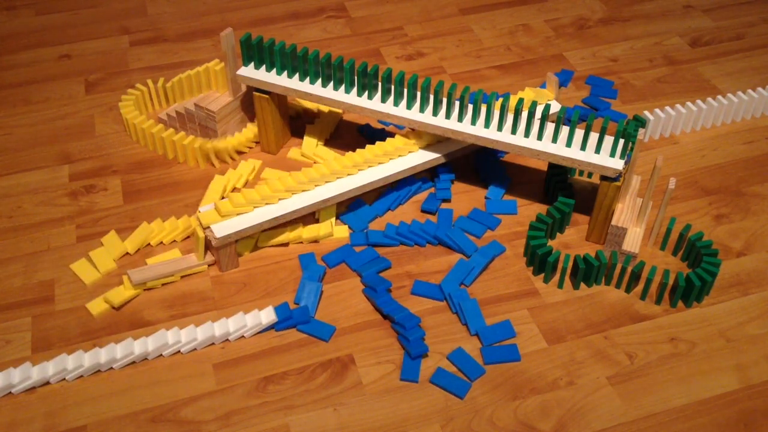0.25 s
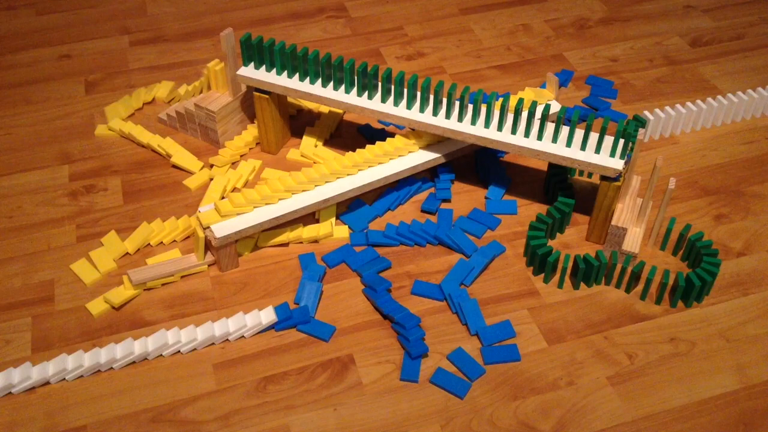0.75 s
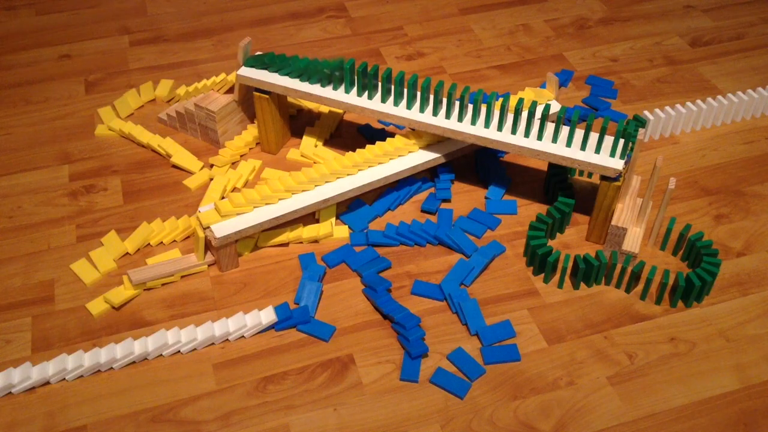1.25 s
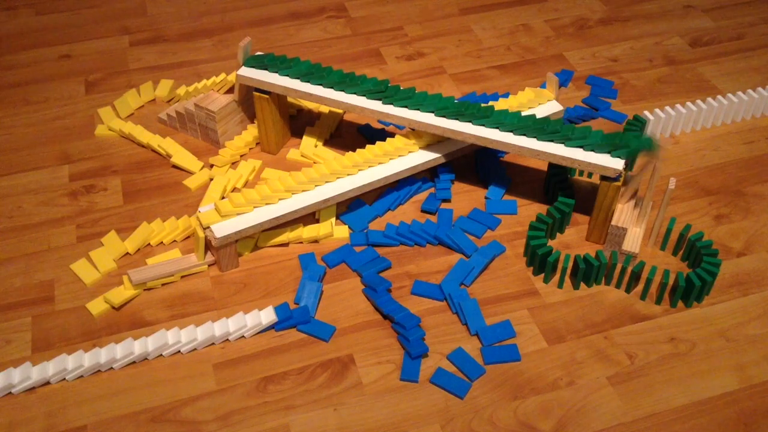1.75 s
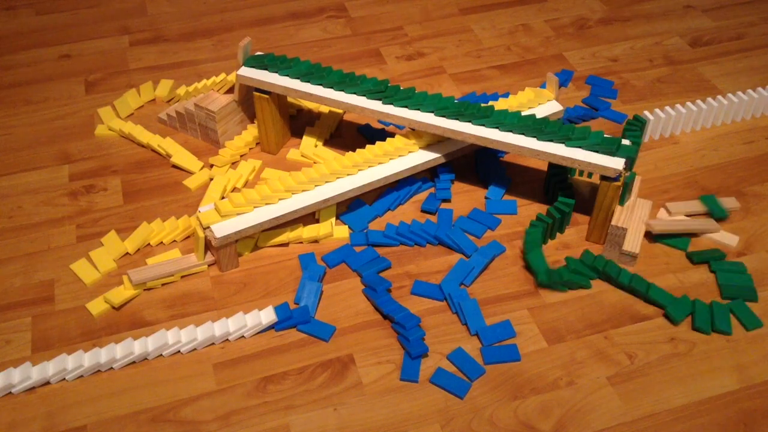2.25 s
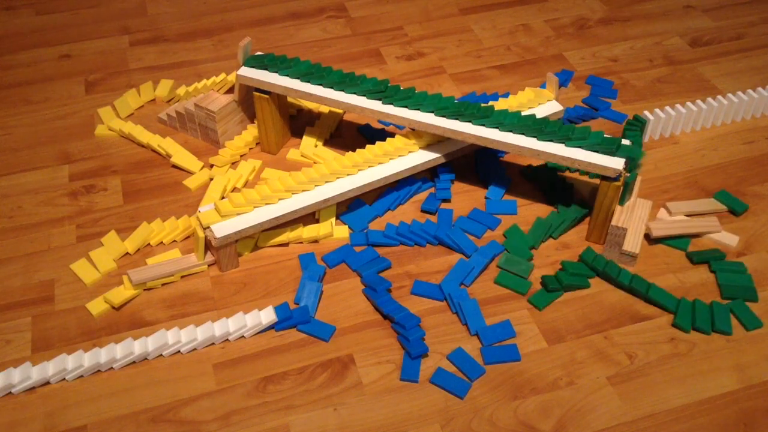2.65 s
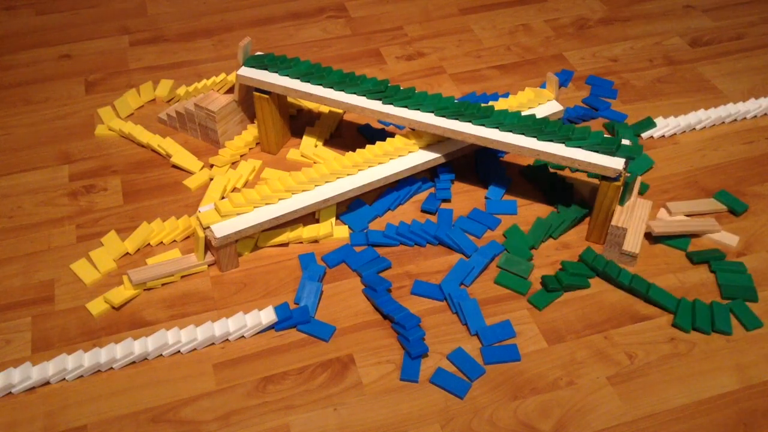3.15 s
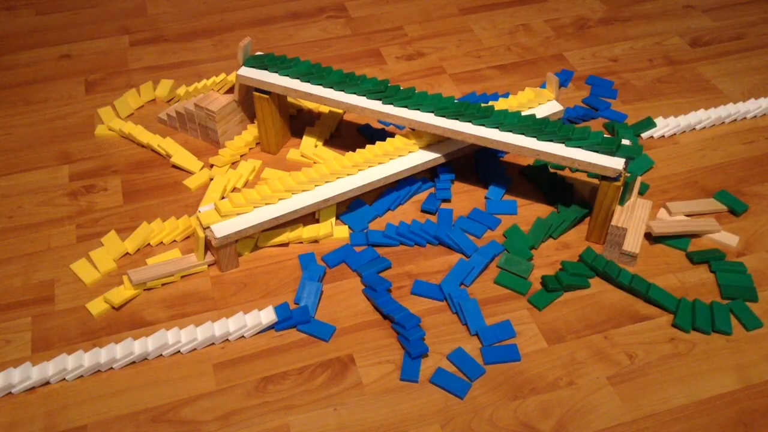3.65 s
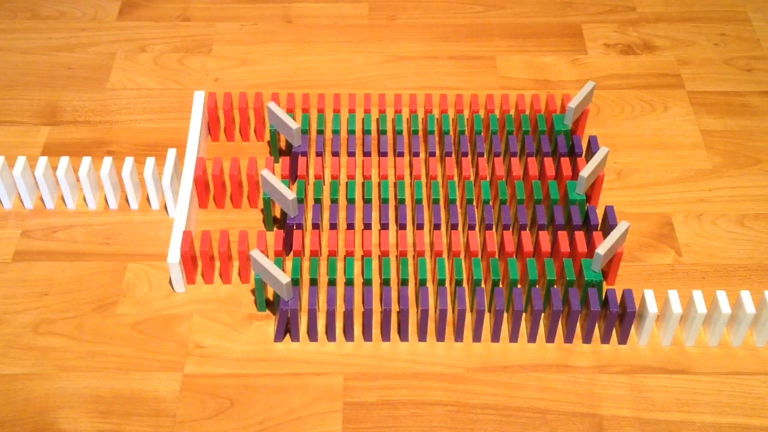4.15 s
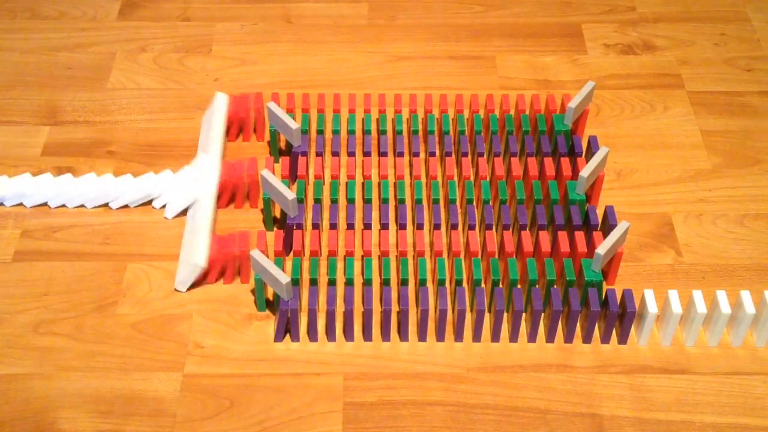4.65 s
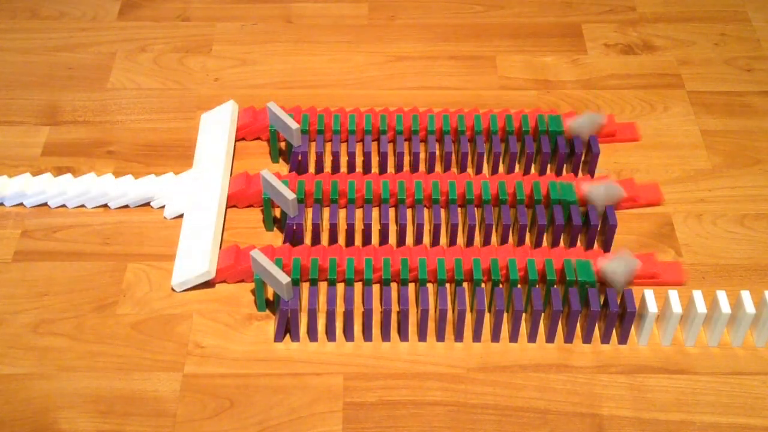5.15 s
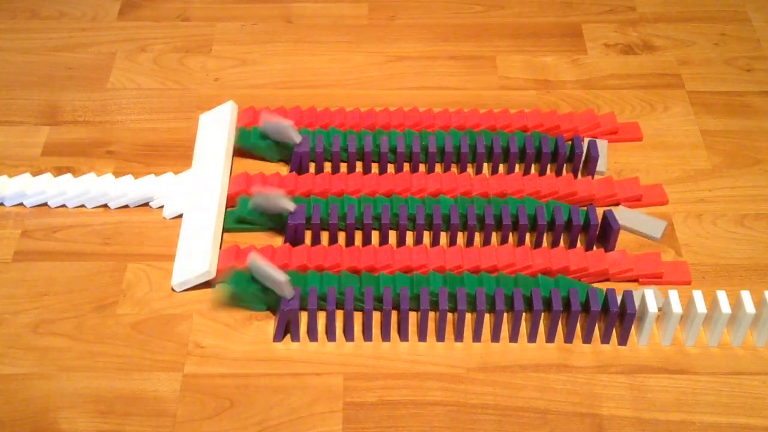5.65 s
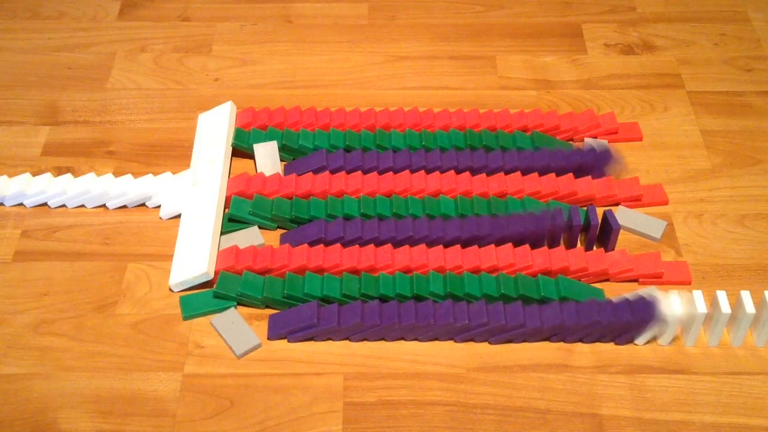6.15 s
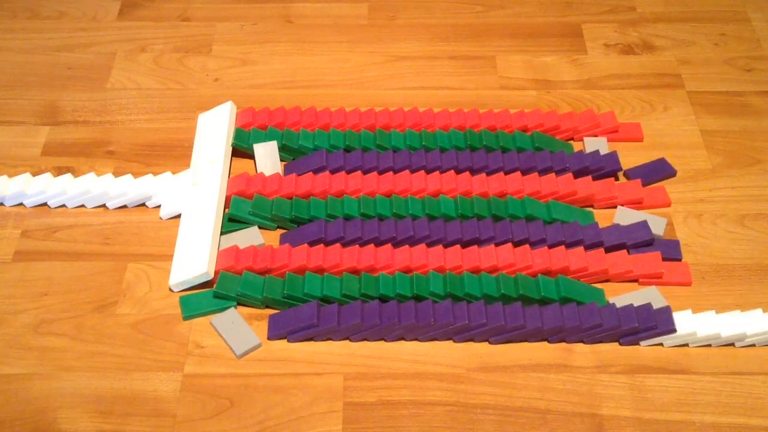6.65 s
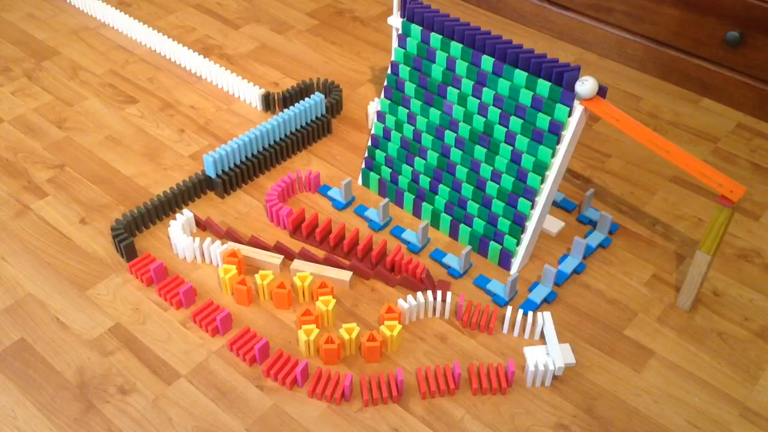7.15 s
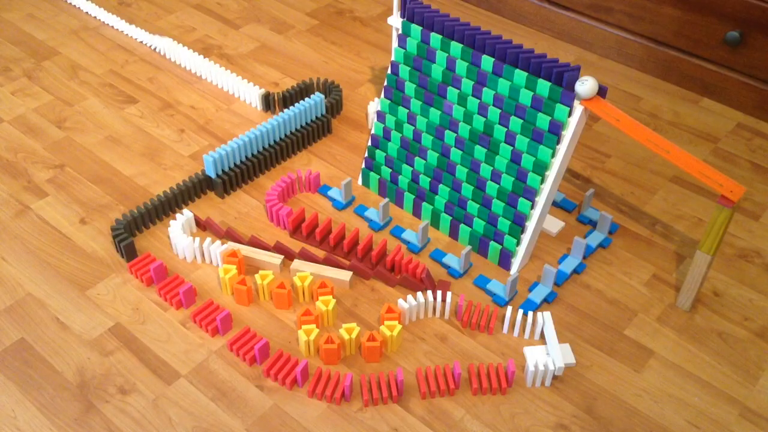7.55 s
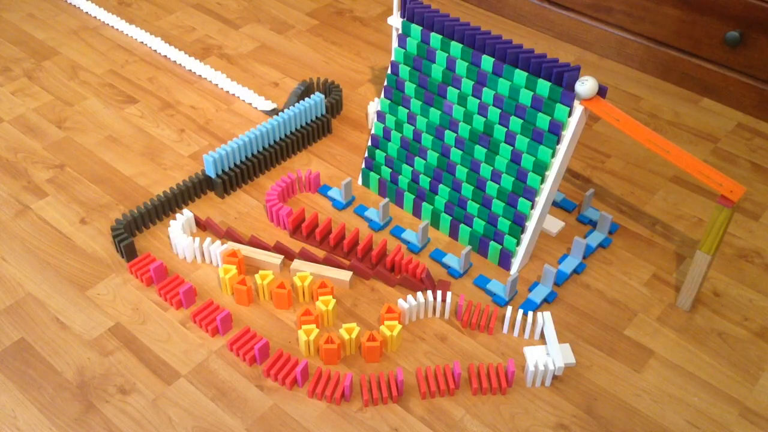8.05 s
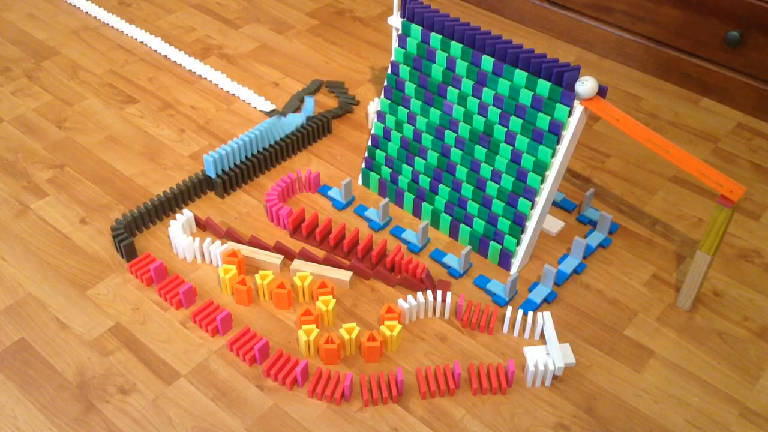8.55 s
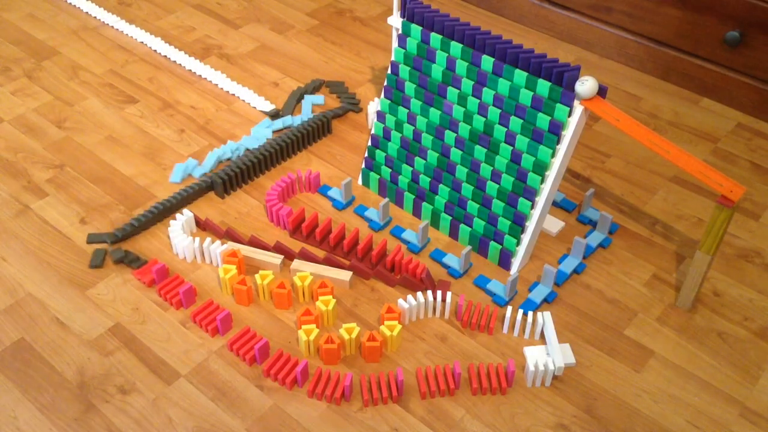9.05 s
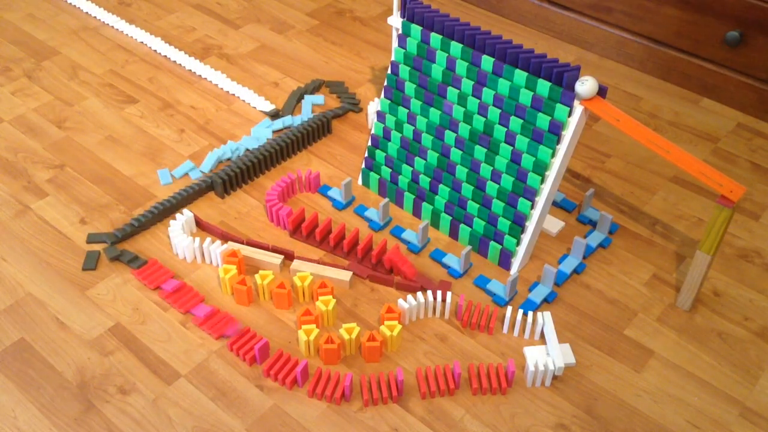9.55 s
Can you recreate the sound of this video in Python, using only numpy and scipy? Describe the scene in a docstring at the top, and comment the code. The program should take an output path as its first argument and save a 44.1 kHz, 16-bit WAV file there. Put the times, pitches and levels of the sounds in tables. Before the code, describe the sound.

Rows of plastic dominoes fall in a rapid clicking rattle, heaping up on floorboards as occasional wooden pieces knock and clink.

```python
"""A rattle of small plastic dominoes toppling on a wooden floor: rows run at about fifty tiles a second,
in three set-ups joined by short fades. Each fall is a quick cascade of contacts that rings the tiles
and knocks the floorboards, with hard snaps and flat thumps on top. Behind it, fallen tiles slide and
heap up, and a few wooden pieces and a long bar ring along in a bare room."""
import sys
import numpy as np
from scipy import signal
from scipy.fft import rfft, irfft, next_fast_len
from scipy.io import wavfile
from scipy.ndimage import uniform_filter1d

SR = 44100
rng = np.random.default_rng(int(sys.argv[2]) if len(sys.argv) > 2 else 0)


def log_audio(samples):
    """Write samples as a 16-bit WAV file to the path given in sys.argv[1]."""
    # one column per channel
    frames = np.atleast_2d(samples).T
    # limit to full scale, then quantise
    limited = np.clip(frames, -1, 1)
    pcm = np.round(limited * 32767).astype(np.int16)
    wavfile.write(sys.argv[1], SR, pcm)


N = 431718
NOW = np.arange(N) / SR
FFT_SIZE = next_fast_len(N + 8192, True)
FREQS = np.fft.rfftfreq(FFT_SIZE, 1 / SR)


def amp(db):
    return 10 ** (np.asarray(db) / 20)


def unit_rms(x):
    return x / np.sqrt(np.mean(x ** 2) + 1e-20)


def curve(points, hz=FREQS):
    """Read (Hz, value) points along a log frequency axis."""
    f, value = np.transpose(points)
    return np.interp(np.log(hz + 1), np.log(f + 1), value)


def resonance(hz, width):
    """Response of one damped mode."""
    return 1j * FREQS * width / (hz * hz - FREQS ** 2 + 1j * FREQS * width)


def colour(points):
    """Minimum-phase EQ through (Hz, dB) points: nothing sounds ahead of the hit."""
    cepstrum = irfft(np.log(amp(curve(points))))
    half = len(cepstrum) // 2
    cepstrum[1:half] *= 2
    cepstrum[half + 1:] = 0
    return np.exp(rfft(cepstrum))


def filtered(x, response):
    """Apply a response, scaled to keep the power of white noise."""
    gain = np.sqrt(np.mean(np.abs(response) ** 2))
    return irfft(rfft(x, FFT_SIZE) * response / gain, FFT_SIZE)[:N]


def impulses(s, size):
    """Clicks of the given sizes at times in seconds."""
    return np.bincount(np.clip((s * SR).astype(int), 0, N - 1), size, N)


# Reverb tone. Each row: frequency in Hz, level in dB.
ROOM_TONE = [(1000, -1), (4400, 3), (7000, 1), (10500, -2), (15000, -11)]
# Reverb length. Each row: frequency in Hz, seconds to fall 60 dB.
ROOM_DECAY = [(200, 0.34), (2000, 0.31), (8000, 0.3), (15000, 0.064)]
def room(x, block=SR // 4, predelay=150):
    """The walls' answer changes as the falling front moves: each block gets a fresh noise tail."""
    out = np.zeros(N + 2 * SR)
    for start in range(0, N, block):
        hz, t, spectrum = signal.stft(rng.standard_normal(SR // 2), SR, nperseg=256)
        spectrum *= amp(curve(ROOM_TONE, hz)[:, None] - 60 * t / curve(ROOM_DECAY, hz)[:, None])
        tail = signal.istft(spectrum, SR, nperseg=256)[1]
        wet = signal.fftconvolve(x[start:start + block], tail / np.linalg.norm(tail))
        out[start + predelay:][:len(wet)] += wet
    return out[:N]


def struck(hits, modes, detune=0, pitch=lambda s: 1):
    """Each blow rings a piece's modes at new strengths; detune scatters their pitch."""
    out, t = np.zeros(N + SR), np.arange(SR // 4) / SR
    attack = 1 - np.exp(-t / 0.00017)
    for s, db in hits:
        ring = 0
        for hz, level, t60 in modes:
            decay = amp(level + rng.normal(0, 3) - 60 * t / t60)
            ring += decay * np.sin(2 * np.pi * hz * pitch(s) * rng.normal(1, detune) * t)
        out[round(s * SR):][:len(t)] += amp(db) * ring * attack
    return out[:N]


# Knocks on each prop. Each row: start in seconds, level in dB.
LONG_BLOCK_HITS = [(0.9378, -17)]
SHORT_BLOCK_HITS = [(1.0774, -21.5)]
SLAT_HITS = [(1.9622, -5.5), (1.9744, -10), (1.9838, -5.5), (2.0062, -16), (2.039, -8), (2.0715, -8),
             (2.1115, -22)]
LONG_BAR_HITS = [(4.5778, -7), (4.597, -4), (4.642, -24), (4.6736, -16), (4.694, -21), (4.7304, -14),
                 (4.7549, -6), (4.775, -15), (4.7993, -10), (4.8177, -7)]
UPRIGHT_HITS = [(1.51, -35), (1.57, -40), (1.67, -40), (1.72, -41), (1.9, -34), (2.1, -30), (2.15, -24),
                (2.19, -21), (2.24, -31)]
# Each prop's ring. Each row: pitch in Hz, level in dB, seconds to fall 60 dB.
LONG_BLOCK_MODES = [(2584, -16, .17), (6546, 0, .03), (6500, -16, .2)]
SHORT_BLOCK_MODES = [(2557, -18, 0.16), (3800, -5, 0.05), (6430, 0, 0.058)]
SLAT_MODES = [(4150, -33, .03), (6980, -7.5, 0.03), (7160, -1, 0.025)]
LONG_BAR_MODES = [(1990, -7, .05), (3779, -12, .035)]
UPRIGHT_MODES = [(2700, 0, .22), (2990, 0, .1)]
def props():
    """Wooden blocks clink, slats tumble, a pushed-over bar chatters and a bridge upright shakes."""
    return (struck(LONG_BLOCK_HITS, LONG_BLOCK_MODES) + struck(SHORT_BLOCK_HITS, SHORT_BLOCK_MODES)
            + struck(SLAT_HITS, SLAT_MODES) + struck(LONG_BAR_HITS, LONG_BAR_MODES)
            + struck(UPRIGHT_HITS, UPRIGHT_MODES))


# The mix for each line of dominoes. Each row: start in seconds, relative shares of four plastic batches,
# then levels in dB of body, top ring, crack, fall knock, clatter rattle and clatter floorboards.
LINE_MIX = [(0, 0.077, 0.84, 0.062, 0.021, -2.5, -7, -3.5, -24, -2.5, -5),
            (.92, 0.41, 0.13, 0.018, 0.0078, -2.5, -4, -9, -22, -2, -2),
            (1.25, 0.3, 0.1, 0.0082, 0.0043, -1, -1, -10, -28, -6, -9.5),
            (1.52, 0.56, 0.046, 0.012, 0.005, 1, 1, -2, -16, -5, -13),
            (1.9, 1, 0.71, 0.071, 0.056, -1, -7, 2.5, -12, -1, -5.5),
            (2.299, 0.85, 0.065, 0.064, 0.15, -1.5, -3, -4, -22, 0, -1.5),
            (2.861, 0.089, 0.69, 0.011, 0.83, -1, -9, 0, -18, -5, -6),
            (3.84, 0.04, 0.73, 0.029, 0.97, -3.5, -17, 1, -10.5, -6.5, -7.5),
            (4.57, 0.054, 0.4, 0.017, 0.25, -1.5, -11, -2, 0.5, -1, -5),
            (4.801, 0.022, 0.2, 0.051, 0.042, -4.5, -12, 2, -10.5, 1, -8.5),
            (5.13, 0.045, 0.51, 0.12, 0.05, 2.5, 4, 3.5, -8, -1.5, -5),
            (5.26, 0.41, 0.14, 0.04, 0.29, -3, -4, 2, -4, 1.5, -6.5),
            (5.9, 0.11, 0.14, 0.5, 0.8, -4.5, -21, 2.5, -9, -3, -9.5),
            (6.36, 0.025, 0.39, 0.017, 0.39, -4.5, -20, 1, -12.5, -6, -9),
            (7.14, 0.022, 0.28, 0.019, 0.33, -2, -16, 1, -23, -6, -9.5),
            (8.03, 0.05, 0.044, 0.78, 0.017, -1.5, -13, 0, -17, -3, -7),
            (8.5, 0.13, 0.16, 0.48, 0.12, -0.5, -2.5, -1, -27, -6.5, -10.5),
            (8.95, 0.28, 0.16, 0.13, 0.079, -2, -11, -1, -3.5, -3.5, -6.5),
            (9.3, 0.13, 0.22, 0.44, 0.0097, -1.5, -16, 0, -21, 0.5, -2.5)]
SHARES, TILE_LEVELS, KNOCK_LEVEL, CLATTER_LEVELS = slice(1, 5), slice(5, 8), 8, slice(9, 11)
def mix_at(s):
    """The mix of the line that is falling at each time."""
    lines = np.array(LINE_MIX)
    return lines[np.maximum(np.searchsorted(lines[:, 0], s, "right") - 1, 0)]


def pick_batch(s, chance):
    """Pick each sounding tile's plastic by its share of the line."""
    share = np.cumsum(mix_at(s)[:, SHARES], axis=1)
    return (chance[:, None] * share[:, -1:] > share).sum(axis=1)


# A tile's six modes. Each row: pitch in Hz, width in Hz, level in dB.
TILE_MODES = [(4343, 76, 6), (4570, 210, 0), (9820, 62, 6), (10727, 89, 10), (11030, 530, 0),
              (12060, 1000, -10)]
# One pitch factor per batch: green, warm colours, dark, white.
BATCH_PITCH = [.947, 1, 1.022, 1.057]
# Each batch's voicing. Each row: dB added to each of the six modes.
BATCH_VOICING = [(0, -5.5, -9, 0, 0, 0), (-4, -5, -0.5, 0, -10, 0), (-1, 0, -4, -1, -10, 0),
                 (-1, 1, 2, 0, -12, 0)]
# Free tiles ring in their two lowest modes, wedged ones hardly. Each row: time in seconds, level in dB.
LOW_RING = [(0, 0), (.7, -1), (1.1, -5), (1.7, 1.5), (2.1, 2), (2.8, 0.5), (3.5, 4), (4.5, 0.5),
            (5.1, -2.5), (5.22, 8), (5.35, -1), (5.7, -5), (6.5, 3), (8, 3.5), (8.45, 1), (8.55, 0.5),
            (8.9, 0.5), (9.05, 4.5), (9.79, 4)]
def tile_contacts(s, size, batch, crack_tone, crack_db):
    """Every contact cracks, and rings a thin top mode, a broad body and the modes of its batch."""
    body_db, top_db, line_crack_db = mix_at(s)[:, TILE_LEVELS].T
    low_ring = amp(np.interp(s, *np.transpose(LOW_RING)) - 6.5)
    out = filtered(impulses(s, size * amp(crack_db + line_crack_db)), colour(crack_tone))
    out += filtered(impulses(s, size * amp(top_db)), resonance(hz=14840, width=310))
    for k, pitch in enumerate(BATCH_PITCH):
        modes = [(-1) ** i * amp(db + BATCH_VOICING[k][i]) * resonance(pitch * hz, width)
                 for i, (hz, width, db) in enumerate(TILE_MODES)]
        own = size * (batch == k)
        out += filtered(impulses(s, own * amp(body_db)), resonance(hz=pitch * 7300, width=3020) ** 2)
        out += filtered(impulses(s, own * low_ring), sum(modes[:2]))
        out += filtered(impulses(s, own), sum(modes[2:]))
    return out


# The floor's knock. Each row: frequency in Hz, level in dB.
BOARD_TONE = [(30, -88), (90, -27), (150, -13.5), (240, -5), (330, 0), (500, -1.5), (900, 2.5), (2500, -43)]
# Hollows under the tiles: a plank bridge, springy boards, gaps between close lines.
# Each row: start and end in seconds, pitch in Hz, width in Hz, level in dB against the boards.
HOLLOW_SPANS = [(1.012, 1.91, 241, 35, -3.5), (3.827, 4.56, 345, 66, -9.5), (4.86, 5.144, 1630, 397, -2),
                (5.14, 5.895, 290, 90, -10.5), (6.41, 7.124, 482, 146, -6), (7.15, 8.41, 353, 75.4, -8)]
def floorboards(push):
    """The boards answer a push; hollow spans add a narrow drumming."""
    out = filtered(push, colour(BOARD_TONE))
    for start, end, hz, width, db in HOLLOW_SPANS:
        out += filtered(amp(db) * push * (NOW > start) * (NOW < end), resonance(hz, width) ** 2)
    return out


def shifting_heap(x, depth_db, bins=3):
    """Contacts and air pockets in the heap shift: narrow resonances come and go."""
    spectrum = signal.stft(x, nperseg=1024)[2]
    drift = uniform_filter1d(rng.standard_normal(spectrum.shape), size=bins, axis=0)
    drift = unit_rms(uniform_filter1d(drift, size=5, axis=1))
    spectrum *= amp(depth_db * np.clip(drift, -2, 1.5))
    return unit_rms(signal.istft(spectrum, nperseg=1024)[1][:N]) * np.std(x)


# How busy the sliding, settling heap is over time. Each row: time in seconds, level in dB.
CLATTER_ACTIVITY = [(0, -22.5), (.115, -35), (.27, -30), (.38, -29.5), (.44, -28), (.51, -24), (.64, -32),
                    (.7, -27.5), (.95, -68), (1.04, -44), (1.17, -52), (1.4, -58), (1.74, -26), (1.83, -35),
                    (1.96, -31), (2.1, -20), (2.36, -30.5), (2.44, -32), (2.59, -31), (2.7, -33), (2.77, -26),
                    (3.1, -29), (4.1, -24), (4.55, -20), (4.7, -33), (5.05, -24), (5.13, -32), (5.33, -31.5),
                    (5.46, -32.5), (5.6, -29), (5.75, -28.5), (5.895, -34.5), (5.98, -30), (6.3, -34),
                    (6.42, -37.5), (7.09, -28.5), (7.23, -22.5), (7.97, -22), (8.19, -33.5), (8.3, -28.5),
                    (8.49, -29.5), (8.52, -20), (8.7, -14), (9.04, -22.5), (9.14, -28), (9.27, -23),
                    (9.345, -29.5), (9.4, -26.5), (9.5, -32.5), (9.6, -33.5), (9.69, -27.5), (9.79, -34)]
# The heap's bright crack and its midrange rattle. Each row: frequency in Hz, level in dB.
HEAP_CRACK = [(1500, -41), (2800, -5), (3700, 2), (5300, -4.5), (7000, -8.5), (9000, 2.5), (12000, -1.5),
              (14000, 1), (17000, -7.5)]
RATTLE_TONE = [(300, -50), (800, 0), (1200, 2.5), (1800, 0), (2600, -3.5), (3600, -2.5), (5000, -6.5),
               (8000, -74)]
def clatter(fall_s, fall_db, count=20000, shake_db=-34, settle_s=0.033, muffle_hz=8300):
    """Tiles slide and heap up: dense, dulled contacts, mostly tiny, stirred by every fall."""
    kicks = impulses(fall_s, amp(2 * (fall_db + shake_db)))
    shaken_power = signal.lfilter([1], [1, -np.exp(-1 / (settle_s * SR))], kicks)
    level = np.sqrt(amp(2 * np.interp(NOW, *np.transpose(CLATTER_ACTIVITY))) + shaken_power)
    sends_db = uniform_filter1d(mix_at(NOW)[:, CLATTER_LEVELS], SR // 30, axis=0)
    rattle_gain, board_gain = level * amp(sends_db.T)
    place, polarity, strength, chance = rng.random((count, 4)).T
    s = place * N / SR
    size = np.sign(polarity - .5) * amp(np.minimum(-3.2 * np.log(strength), 17))
    taps = unit_rms(impulses(rng.random(count) * N / SR, np.sign(size) * np.abs(size) ** 0.31))
    ring = tile_contacts(s, size, pick_batch(s, chance), HEAP_CRACK, crack_db=-0.5)
    ring = level * unit_rms(filtered(ring, 1 / (1 + 1j * FREQS / muffle_hz)))
    rattle = filtered(rattle_gain * taps, colour(RATTLE_TONE)) + floorboards(board_gain * taps)
    return shifting_heap(ring, depth_db=1.8, bins=9) + shifting_heap(rattle, depth_db=2.2)


# Stray bounces. Each row: start in seconds, level in dB.
BOUNCES = [(.43, -35), (.48, -33), (.53, -35), (.6, -31), (.66, -35), (.71, -23), (.78, -28), (.82, -28),
           (.86, -24), (1.17, -43), (1.24, -39), (1.85, -22), (2.06, -32), (2.11, -17), (2.16, -19.5),
           (2.2, -22), (2.245, -30), (2.295, -20.5), (2.5, -16), (2.74, -22), (2.76, -26), (2.78, -32),
           (2.815, -23), (5.15, -17), (5.175, -27), (5.2, -28), (5.23, -38), (8.58, -22), (8.66, -31),
           (8.85, -45), (8.965, -31), (8.995, -17), (9.03, -22), (9.06, -22), (9.09, -30)]
# A free green tile's ring. Each row: pitch in Hz, level in dB, seconds to fall 60 dB.
FREE_MODES = [(4083, 3, 0.07), (4270, -5.5, 0.087)]
def bouncing_tiles():
    """Tiles bounce free of the heap and tinkle, tuned to the line's commonest batch."""
    def pitch(s):
        return BATCH_PITCH[np.argmax(mix_at(s)[SHARES])] / BATCH_PITCH[0]
    return struck(BOUNCES, FREE_MODES, detune=0.009, pitch=pitch)


# Pieces landing flat. Each row: start in seconds, level in dB.
LANDINGS = [(.7777, -20), (2.01, -27), (2.716, -15), (4.436, -20), (4.723, -26), (5.149, -2.5),
            (5.153, -16), (5.269, -10.5), (5.561, -25), (5.716, -20), (5.829, -8), (5.834, -20),
            (5.843, -11.5), (5.847, -21), (5.861, -12), (5.865, -19), (5.874, -10.5), (5.879, -12),
            (5.9116, -20), (5.941, -30), (7.152, -23), (9.152, -15), (9.196, -10), (9.375, -10.5),
            (9.623, -23), (9.751, -38)]
def thumps():
    """Each landing is one push into the boards and the loose tiles around it."""
    s, db = np.transpose(LANDINGS)
    push = impulses(s, amp(db))
    return amp(6.5) * filtered(push, colour(BOARD_TONE)) + amp(13) * filtered(push, colour(RATTLE_TONE))


# Crack of edge against face, in snaps and falls. Each row: frequency in Hz, level in dB.
EDGE_TONE = [(1500, -51), (3000, 7), (4500, -6), (6000, -6.5), (7500, -4), (9000, 2), (12000, -6),
             (14000, 0.5), (17000, -4.5)]
# Sharp accents. Each row: time in seconds, level in dB, pitch in Hz.
SNAP_HITS = [(0.247, -13, 10700), (0.391, -8.5, 10500), (0.4335, -1, 9790), (0.4926, -8, 10000),
             (0.655, -4.5, 7540), (0.6596, 1.5, 6600), (0.777, -3, 10800), (0.7768, -13, 4000),
             (0.811, -9, 10700), (0.8144, -10.5, 9620), (1.1693, -9.5, 10000), (1.1715, -9, 10100),
             (1.242, -17, 10700), (1.2645, -11, 10200), (1.2904, -7, 10200), (1.3535, -8, 10500),
             (1.559, -11, 6000), (1.62, -1, 10000), (1.6414, -1, 10100), (1.706, -5.5, 10100),
             (1.8452, -12, 4600), (2.0385, -4, 7040), (2.1116, 3, 7900), (2.3775, -2, 10600),
             (2.402, -8, 10100), (2.414, -9, 10200), (2.4952, -6, 10300), (2.6084, -5, 10300),
             (2.629, -4, 10600), (2.6322, -7, 10800), (2.829, -9, 7200), (2.8644, -12, 10200),
             (2.9074, -8, 10800), (2.9495, 4, 11100), (2.9705, -2, 11300), (3.053, -9, 10800),
             (3.0915, 1, 11400), (3.1494, -3, 7160), (3.1678, -7, 10800), (3.6844, -5, 10800),
             (3.9532, 0, 10400), (4.1239, -8, 10800), (4.1795, -1, 10800), (4.2785, 4.5, 11300),
             (4.839, -4, 10700), (4.8873, -1, 10700), (4.9834, -6, 10700), (5.1468, -4, 4460),
             (5.1483, 1, 10000), (5.165, 2, 10200), (5.1697, -4, 9300), (5.172, -3, 6760),
             (5.2678, -12, 3500), (5.2778, -14, 6000), (5.33, -25, 8000), (5.336, -22, 8000),
             (5.381, -24, 8500), (5.39, -16, 8500), (5.427, -10, 9000), (5.4334, -10, 8500),
             (5.448, -14, 7000), (5.479, -9, 8550), (5.6292, -11, 11000), (5.6905, -14, 10300),
             (5.7131, 2, 11300), (5.7146, -8, 4200), (5.718, -7, 3800), (5.74, -4, 7180),
             (5.7583, -11, 9720), (5.7932, -11, 11000), (5.9105, -7, 9000), (5.912, -5, 5100),
             (5.9139, -1, 11300), (6.083, -6, 11300), (6.34, 1.5, 8650), (6.5277, -9, 10700),
             (6.704, -9, 10400), (7.68, 1, 10500), (7.9168, -26, 10700), (8.07, 1, 7880), (8.514, -9, 6730),
             (8.518, 3, 6450), (8.5807, -7, 4000), (8.7176, -4, 11000), (8.7305, 2, 11200),
             (8.945, 2, 10100), (9.0179, -8, 10100), (9.1512, -12, 6000), (9.164, -5, 6550),
             (9.1816, -7, 10000), (9.2189, -15, 10100), (9.2339, -9, 10200), (9.282, -8, 6000),
             (9.3115, -22, 8500), (9.354, -18, 9000), (9.374, -12, 7200), (9.406, -14, 8000),
             (9.555, -1, 11000), (9.6085, -15, 8500), (9.7524, -12, 9000)]
def snaps(decay_cycles=3.5):
    """A hard, bright snap: a burst of a few cycles, then the tile's ring."""
    cues = np.add(SNAP_HITS, [.0008, 0, 0])
    bursts, t = np.zeros(N + SR), np.arange(SR // 200) / SR
    for s, db, hz in cues:
        burst = np.sin(2 * np.pi * hz * t) * np.exp(-t * hz / decay_cycles)
        bursts[round(s * SR):][:len(t)] += amp(db + 3) * burst
    s, db, _ = cues.T
    batch = pick_batch(s, rng.random(len(s)))
    return bursts[:N] + tile_contacts(s, amp(db - 1), batch, EDGE_TONE, crack_db=4)


# Steady runs. Each row: first and last fall in seconds, tile count, first and last level in dB.
STEADY_RUNS = [(0.248, 0.31, 6, 0, 4.5), (0.389, 0.496, 6, -1.5, 4), (1.333, 1.724, 20, 6, -0.5),
               (2.19, 2.356, 7, -10, -25), (2.865, 3.15, 15, 5.5, 4), (3.169, 3.54, 20, 6, 3.5),
               (3.56, 3.785, 12, 2.5, -2), (3.859, 3.915, 4, 4.5, 5), (3.933, 4.263, 17, 4.5, 7),
               (4.277, 4.557, 15, 6.5, 9), (4.8381, 5.092, 17, 9.5, 10.5), (5.368, 5.45, 8, -6, -3.5),
               (5.527, 5.63, 7, -1.5, -1.5), (6.114, 6.221, 9, 1.5, 1.5), (6.38, 6.686, 16, -3.5, -1.5),
               (6.705, 6.918, 12, 0.5, -1), (6.939, 7.108, 9, -0.5, -11), (7.181, 7.917, 38, -3.5, 4),
               (8.426, 8.488, 4, -7, -1), (8.518, 8.62, 7, 7, 11)]
# Tiles falling on their own, plus louder accents within the runs. Each row: start in seconds, level in dB,
# nominal cascade length in ms.
LISTED_FALLS = [(0.128, 3.5, 4.8), (0.145, 3.5, 4.4), (0.263, 6, 5), (0.657, 6, 5.4), (0.7767, 6.5, 3.1),
                (0.812, 8, 4.1), (0.8776, -0.5, 3), (0.937, -13, 5.4), (1.033, -26, 3), (1.0778, -9, 1.5),
                (1.1216, -9, 2.1), (1.169, -7, 4.4), (1.208, -4, 1.14), (1.238, 0, 3), (1.2642, 4.5, 4),
                (1.2902, 0.5, 5.2), (1.312, 4.5, 4.3), (1.3575, -5, 2), (1.619, -8, 3.6), (1.84, -6, 3),
                (1.8448, 2.5, 4.1), (1.855, -10, 2.5), (1.9016, 2.5, 8.2), (2.0035, 12.5, 7.1),
                (2.0523, 6, 1.8), (2.1124, 9.5, 3), (2.149, 7.5, 3), (2.181, 3, 13), (2.3783, -2, 3.3),
                (2.402, 0.5, 2.2), (2.414, 3, 1.5), (2.497, -1, 2.7), (2.5036, 3.5, 3.2), (2.61, -4, 2.9),
                (2.628, 6, 5.6), (2.739, 4, 8.9), (2.829, -4, 1.6), (2.948, -10, 2.3), (2.968, 3, 2),
                (3.051, 7.5, 2.7), (3.0905, 4, 1.6), (3.153, -13, 3.8), (3.622, 6.5, 4.5),
                (4.686, -14, 2.6), (4.699, -5, 3.5), (4.7257, 1, 2.7), (4.7757, 6.5, 6.4),
                (4.7997, 7.5, 4.8), (4.817, 8, 4.2), (5.1447, 10.5, 9.2), (5.1656, 2, 3.2),
                (5.2742, 3, 4.6), (5.287, -10, 4.4), (5.477, -2, 4), (5.491, 2.5, 3), (5.692, 2, 1),
                (5.7136, 8, 2.74), (5.738, 1, 3.7), (5.759, 5.5, 1.26), (5.794, -3, 1.3),
                (5.9129, 5.5, 2.9), (6.035, -2, 2.1), (6.042, 1.5, 4.2), (6.084, 1, 2.1), (6.095, 2.5, 4),
                (6.243, 8, 6.4), (6.263, 6.5, 5), (6.279, 8.5, 7), (6.301, -4, 2.7), (6.321, 6, 3.9),
                (6.3418, -5, 1.7), (7.382, 1, 2.9), (7.6812, -2, 2.6), (8.04, 6, 4.8), (8.0708, 5.5, 3.4),
                (8.201, -13, 2), (8.218, 3, 6.6), (8.261, 7, 5.2), (8.3287, 3.5, 7.6), (8.39, 0, 5.9),
                (8.514, -18, 4.6), (8.725, 9, 4), (8.784, 10, 3.2), (8.8467, 10.5, 8.2), (8.948, -10, 3.1),
                (8.99, 2, 1.7), (9.0302, 5, 3), (9.0633, 2, 9.1), (9.108, 0.5, 3), (9.1519, 1, 1.06),
                (9.165, 4, 1.1), (9.182, -4, 0.46), (9.221, 3.5, 0.35), (9.2356, 3.5, 0.92),
                (9.2834, 2, 2.3), (9.377, -2.5, 0.44), (9.358, -11, 2), (9.517, 1.5, 4.7), (9.558, 1, 2.7),
                (9.61, -11, 2.1), (9.625, -4, 2), (9.681, 4, 8), (9.7, 1, 2.7), (9.7522, 7, 1.02)]
def chain_reaction(scatter_s=.0009, scatter_db=1.35, cascade_ms=3.4):
    """Cue every fall: time, level, cascade length and whether it is listed on its own rather than in a run;
    runs are slightly uneven."""
    even = np.vstack([np.linspace([first, first_db], [last, last_db], round(count))
                      for first, last, count, first_db, last_db in STEADY_RUNS])
    jitter = np.clip(rng.standard_normal((len(even), 3)), -1.5, 1.5)
    runs = np.c_[even + jitter[:, :2] * [scatter_s, scatter_db], cascade_ms * np.exp(.3 * jitter[:, 2])]
    cues = np.vstack([runs, LISTED_FALLS])
    return *cues.T, np.arange(len(cues)) >= len(runs)


def falling_tiles(s, db, length_ms, listed, contacts=12, edge_hz=9500, edge_db=5.5):
    """A falling tile strikes the next, and the blow runs back through the leaning tiles behind it."""
    jitter, strength, chance = rng.random((len(s), 3, contacts)).transpose(1, 0, 2)
    place = (np.arange(contacts) + jitter) / contacts
    when = (s[:, None] + 1.6 * length_ms[:, None] / 1000 * place - .0007).ravel()
    swell = np.minimum(place / 0.7, 1) * amp(-9 * place)  # the cascade builds, then weakens
    size = np.sign(strength - .5) * swell * amp(-14 * np.abs(2 * strength - 1))
    size[listed, 1] = 0.37  # a fall listed on its own opens with a firm strike
    size *= amp(db[:, None]) / np.linalg.norm(size, axis=1, keepdims=True)
    size = size.ravel()
    hard_db = np.repeat(-3 * np.log2(np.clip(length_ms, .4, 9) / 3), contacts)  # short falls hit hard
    ring = tile_contacts(when, size, pick_batch(when, chance.ravel()), EDGE_TONE, crack_db=hard_db - 3)
    edge_shelf = (1 + amp(edge_db) * 1j * FREQS / edge_hz) / (1 + 1j * FREQS / edge_hz)
    ring = filtered(ring, edge_shelf)  # edge strikes are brighter
    knock_db = np.repeat(mix_at(s)[:, KNOCK_LEVEL], contacts)
    knock = impulses(when, size * amp(knock_db + 0.13 * hard_db))
    return amp(-2) * ring + filtered(knock, colour(RATTLE_TONE)) + amp(-6.5) * floorboards(knock)


def plank_notch(x, start_s=0.94, end_s=1.74):
    """While tiles cross the raised plank, it sends out little just above its drumming."""
    band = irfft(rfft(x, FFT_SIZE) * resonance(hz=395, width=200), FFT_SIZE)[:N]
    on_plank = uniform_filter1d(1. * (NOW > start_s) * (NOW < end_s), size=SR // 20)
    return x - band * on_plank


def scene():
    """Falls and ringing pieces feed the room; the clatter bed stays dry."""
    ringing = props() + bouncing_tiles()
    s, db, length_ms, listed = chain_reaction()
    blows = falling_tiles(s, db, length_ms, listed) + thumps() + snaps()
    reverb = room(amp(-8) * blows + amp(-9) * ringing)
    return plank_notch(blows + ringing + reverb + clatter(s, db))[None]


# Dips between set-ups. Each row: centre in seconds, half length in seconds.
FADES = [(3.833, 0.024), (7.135, 0.031)]
# Master EQ. Each row: frequency in Hz, gain in dB.
MASTER_EQ = [(60, -23), (150, -17), (250, -4), (13000, -2), (14300, -9), (15100, -10.5), (15250, -20),
             (15350, -24), (16600, -45)]
def record(dry, ceiling=1.2, top_hz=16660):
    """Fade between set-ups, soft-clip the peaks, thin the bass and cut the highest treble."""
    fade = np.prod([np.clip(np.abs(NOW - s) / half, .03, 1) for s, half in FADES], axis=0)
    faded = dry * fade
    clipped = faded / (1 + np.abs(faded / ceiling) ** 6) ** (1 / 6)
    eq = amp(curve(MASTER_EQ)) * (FREQS < top_hz)
    return irfft(rfft(clipped, FFT_SIZE) * eq, FFT_SIZE)[:, :N]


dry = scene()
out = record(dry)
log_audio(out)
```